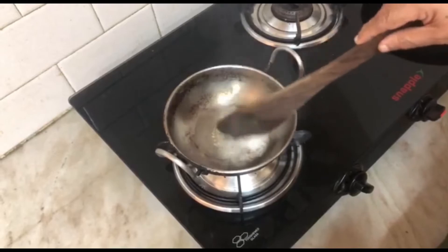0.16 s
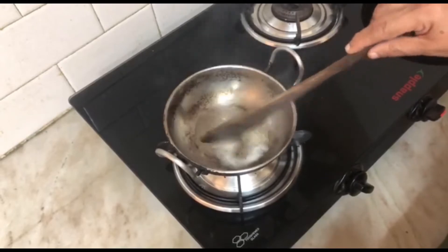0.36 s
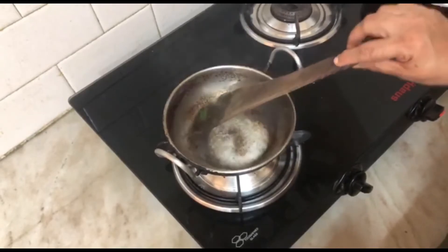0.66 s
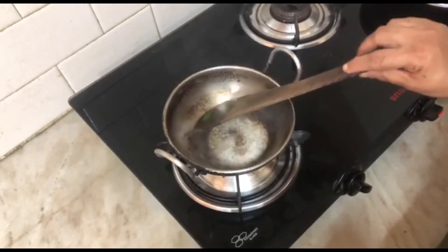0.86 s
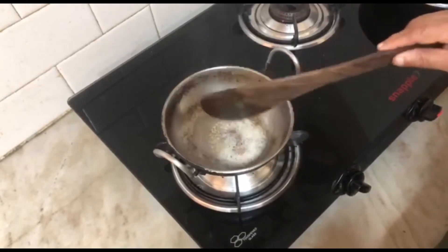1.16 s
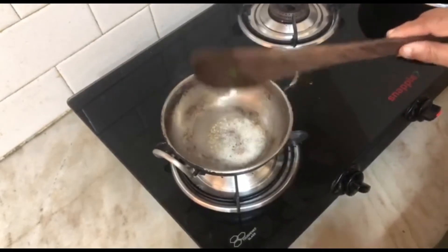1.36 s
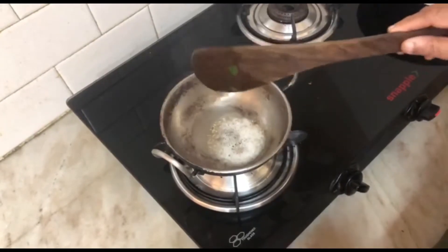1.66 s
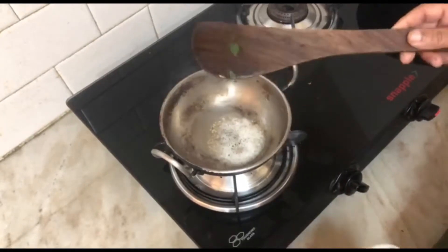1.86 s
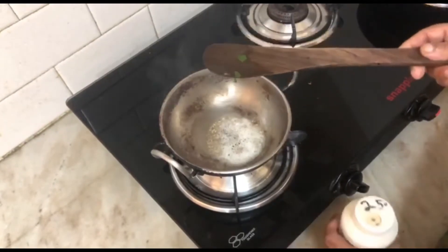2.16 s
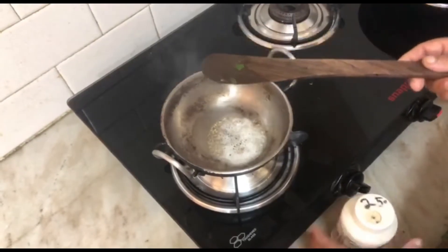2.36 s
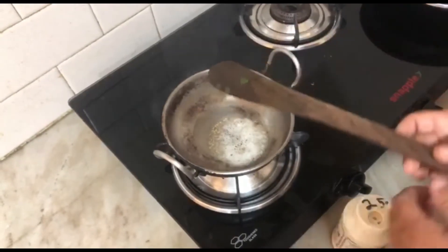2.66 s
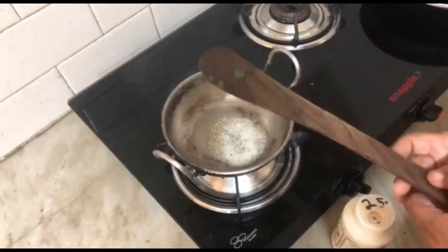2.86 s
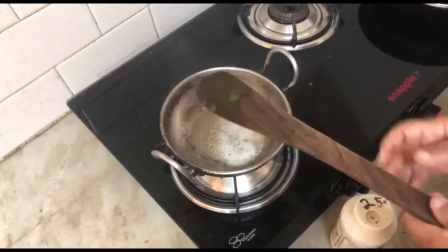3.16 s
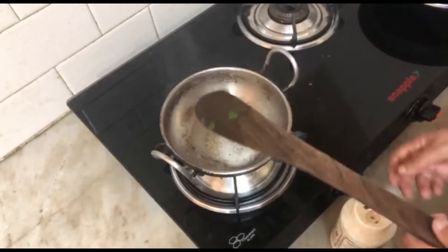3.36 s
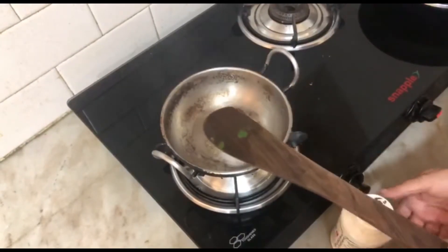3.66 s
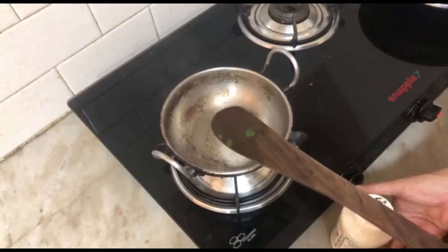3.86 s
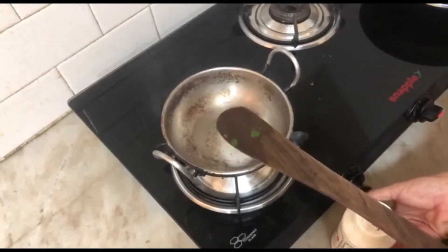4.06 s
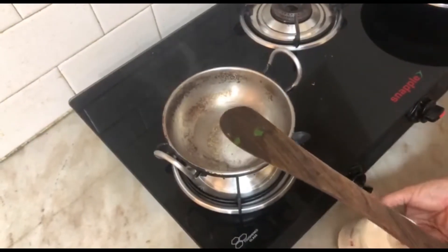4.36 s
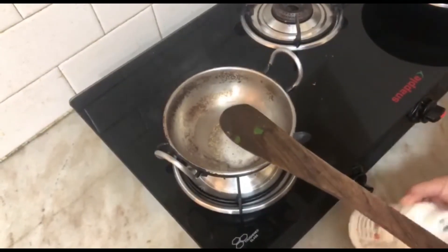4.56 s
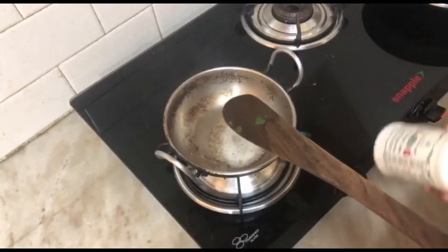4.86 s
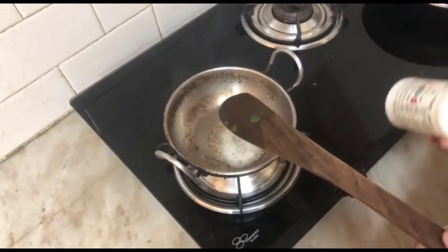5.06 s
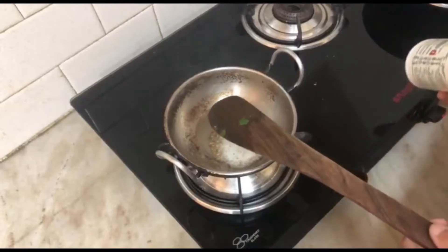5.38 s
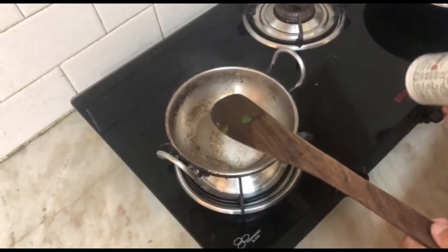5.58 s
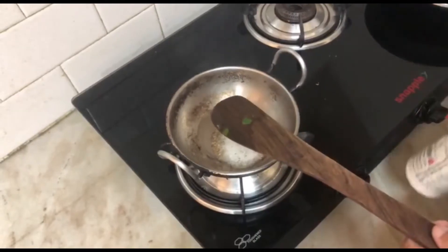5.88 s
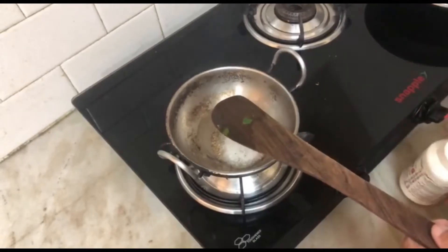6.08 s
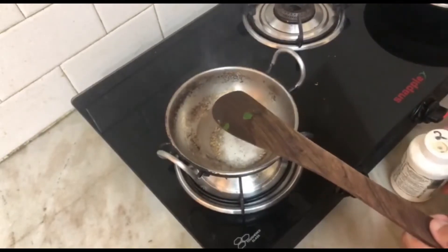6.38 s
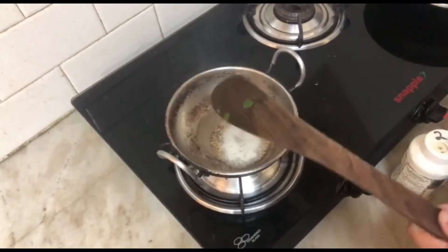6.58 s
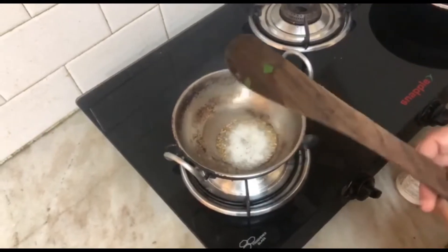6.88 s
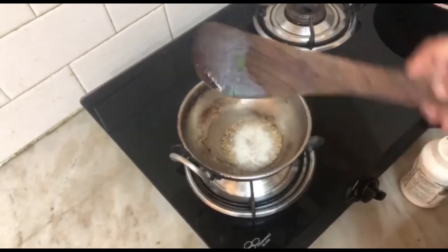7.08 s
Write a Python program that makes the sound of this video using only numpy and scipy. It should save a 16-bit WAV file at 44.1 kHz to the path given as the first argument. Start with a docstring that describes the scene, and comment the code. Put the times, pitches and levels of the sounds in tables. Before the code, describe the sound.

Seeds splutter with sharp, bright pops in hot oil over a steadily rushing gas flame, thinning out as dull wooden knocks sound nearby.

```python
"""A gas flame rushes and hot oil fizzes; at once seeds splutter in a small steel pan, in a tiled kitchen.
Flame and fizz are coloured noise, the fizz flaring as a wooden spatula stirs the oil and then settling.
Mustard and cumin seeds burst as damped cavity rings, coloured by the bowl and followed by echoes.
A spice jar and the spatula knock dully: contact sounds start the decaying modes of stove and counter."""
import sys
import numpy as np
from scipy import signal
from scipy.fft import rfft, irfft
from scipy.io import wavfile

SR = 44100
rng = np.random.default_rng(int(sys.argv[2]) if len(sys.argv) > 2 else 0)


def wav_out(sig):
    """Save sig, one row per channel (or a flat mono array), as 16-bit PCM at SR to the path in sys.argv[1]."""
    wavfile.write(sys.argv[1], SR, np.round(np.clip(np.atleast_2d(sig).T, -1, 1) * 32767).astype(np.int16))


N = 318842

# steady rush of the burner: pitch_hz, relative_level_db
BURNER_SPECTRUM = [(25, -12), (38, -9.5), (70, -12), (150, -9.5), (330, -11), (600, -13.5), (950, -20),
                   (1270, -14), (1600, -20.5), (2170, -15.5), (2700, -23.5), (4500, -26.5), (8000, -35.5),
                   (11500, -42)]
# hollow resonances driven by the flame: pitch_hz, width_at_half_lift_hz, lift_db
FLAME_HOLLOWS = [(51.3, 14.4, 13.5), (97.7, 16.6, 14.5), (135, 8.8, 8.5), (282.2, 6.6, 5), (755.6, 130, 10)]
# spectrum of the boiling ticks: pitch_hz, relative_level_db
FIZZ_SPECTRUM = [(600, -6), (1500, -4.5), (3000, -8), (5500, -5.5), (8000, -11), (11000, -19.5)]
# strokes of the spatula that freshen the fizz: start_s, level_db, settling_db_per_s
SPATULA_STROKES = [(0, -52, 26.5), (0.714, -49.5, 118)]
# what the bowl radiates of a burst: pitch_hz, relative_level_db
BOWL_RADIATION = [(200, -44), (500, -13.5), (750, -4), (1100, 3.5), (1800, 1.5), (2300, -0.5), (2750, 1),
                  (3400, 4), (4500, 2), (5600, 3.5), (7000, 0.5), (9000, -3.5), (11000, -7)]
# first echoes from the pan wall and the hob: delay_s, gain_ratio
FIRST_ECHOES = [(.00044, 0.24), (.0013, 0.14), (.0045, .17)]
# decay of the kitchen's reflections: pitch_hz, t60_s
KITCHEN_DECAY = [(150, 0.63), (1000, 0.46), (3000, 0.46), (6000, 0.36), (11000, 0.54)]
# louder bursting seeds: start_s, level_db (over 1 ms), cavity_pitch_hz, husk_snap_db (against the ring)
LOUD_SEEDS = [(0.0202, -37.5, 4860, -11), (.0664, -35, 7020, -8), (0.0951, -27, 2020, -18),
              (0.1739, -16, 1820, -2), (.2168, -31.5, 1840, -30), (.3891, -23, 5000, -2.5),
              (0.4176, -33.5, 950, -5), (0.4345, -30.5, 1390, -6), (.6593, -44.5, 5900, -15),
              (.802, -40, 7700, -13), (0.8374, -38.5, 2320, 2), (0.8458, -29.5, 1170, 15),
              (.8588, -40, 4310, -10), (1.2155, -45.5, 5140, -12), (1.4047, -47, 5620, -28),
              (1.5647, -22, 5420, -9), (1.8956, -30.5, 1370, -19.5), (2.1045, -42.5, 8600, 1),
              (2.1219, -29, 1920, -24), (2.4812, -46, 2630, -9), (2.6247, -45, 7000, -8),
              (2.8751, -30, 1320, 6), (2.9223, -40.5, 5000, -14), (3.4278, -28.5, 1080, -7.5),
              (3.5292, -41.5, 5400, -2), (3.6833, -38, 1950, -4), (3.766, -46, 7000, -3),
              (3.7762, -42.5, 5600, -21), (3.9468, -47.5, 9300, -9), (4.3527, -46, 3350, -30),
              (4.484, -37, 5730, -3), (4.5319, -40, 1870, -5), (4.7986, -38, 4700, 2),
              (4.8865, -39, 910, 0), (4.9988, -45.5, 4500, -4), (5.2146, -42, 2290, -35),
              (5.3663, -26.5, 8800, -3), (5.4602, -40, 950, -32), (5.6592, -28.5, 930, -10),
              (5.7768, -34, 5600, -22), (6.1315, -32, 2050, 13), (6.4816, -37, 1900, -9)]
# dull knocks: start_s, level_db, blow_centre_hz, blow_q (narrowness), contact_clack_db
DULL_KNOCKS = [(0.716, -52, 286, 4.2, -51), (2.058, -48, 286, 2.3, -65), (2.087, -51, 195, .8, -69),
               (2.209, -46, 208, 2.7, -56.5), (3.999, -54.5, 207, 3.1, -73),
               (6.065, -38.3, 155, 0.83, -41.5), (6.268, -40, 174, 0.52, -45),
               (6.341, -41, 290, 0.6, -42.5), (6.383, -42.5, 327, 0.55, -54.5),
               (6.995, -57, 210, 7.6, -56.5)]
# modes of the stove and counter: pitch_hz, relative_level_db, t60_s
STOVE_MODES = [(91, 1, 0.48), (139, -7.5, 0.62), (179.8, -4, 0.5), (235, -14, 0.6), (266.6, -2, 0.34),
               (301.6, -8, 0.21), (352, -10, 0.38), (424, -9.5, 0.34), (495, -5.5, 0.12), (738, -30, 0.067)]

RESTING_FIZZ_DB, DRYING_DB_PER_S = -67, 2.4  # the resting fizz sinks as the moisture boils off
STIR_RISE_DB_PER_S = 1000
CAVITY_WIDTH_HZ = 670  # the oil damps every cavity equally fast, so higher pops ring for more cycles
FAINT_DB, FAINT_SPREAD_DB, FAINT_SNAP_DB = -54, -1.5, -19
FAINT_LOW_HZ, FAINT_HIGH_HZ = 1730, 8200  # pitches of a large and a small cavity
# contact tick that starts a knock; TICK_DB is against the clack
TICK_HZ, TICK_Q, TICK_SNAP_DB, TICK_DB = 1150, 0.96, -26, 4
TOP_HZ = 11800


def gain_of(db):
    """Decibel law: 20 dB is a tenfold amplitude."""
    return 10 ** (np.asarray(db) / 20)


def evened(x):
    """Normalisation to unit rms."""
    return x / np.sqrt(np.mean(x ** 2) + 1e-20)


def read(points, hz):
    """Interpolation of a spectrum along a logarithmic frequency axis."""
    f, value = np.transpose(points)
    return np.interp(np.log(hz + 1), np.log(f + 1), value)


def add(mix, s, sound):
    """Superposition: a sound joins the mix at time s."""
    part = mix[max(round(s * SR), 0):][:len(sound)]
    part += sound[:len(part)]


def drift(rate_hz):
    """Low-passed noise: a random wander of unit rms, mostly slower than rate_hz."""
    hz = np.fft.rfftfreq(N, 1 / SR)
    low_pass = (hz > 0) / (1 + (hz / rate_hz) ** 4)
    return evened(irfft(rfft(rng.standard_normal(N)) * low_pass, N))


def burner(level_db=-53.5, flutter_db=1.52):
    """Resonant excitation: broadband flame noise flutters and sets the hollows under the pan humming."""
    hz = np.fft.rfftfreq(N, 1 / SR)
    colour_db = read(BURNER_SPECTRUM, hz)
    for f, width, lift_db in FLAME_HOLLOWS:
        colour_db = colour_db + lift_db / (1 + (2 * (hz - f) / width) ** 4)
    rush = evened(irfft(rfft(rng.standard_normal(N)) * gain_of(colour_db), N))
    return gain_of(level_db + flutter_db * drift(rate_hz=31.0)) * rush


def fizz(per_s=1500):
    """Shot noise: countless ticks of moisture boil off in the oil; each stir makes them flare and settle."""
    t = np.arange(N) / SR
    ticks = rng.choice([-1, 1], N) * (rng.random(N) < per_s / SR)
    colour = gain_of(read(FIZZ_SPECTRUM, np.fft.rfftfreq(N, 1 / SR)))
    sound = irfft(rfft(ticks) * colour, N)
    levels_db = [RESTING_FIZZ_DB - DRYING_DB_PER_S * t]
    for s, db, settling in SPATULA_STROKES:
        fall_db = np.maximum(STIR_RISE_DB_PER_S * (s - t), settling * (t - s))
        levels_db.append(db - fall_db)
    envelope = np.linalg.norm(gain_of(levels_db), axis=0)  # powers add
    return evened(sound) * envelope


def bubbles(level_db=-67.5, per_s=75, spread_db=4.5, count=16):
    """Bubble resonance: small steam bubbles break round the seeds, each size with its own pitch."""
    out = np.zeros(N)
    for hz in np.geomspace(1500, 4400, count):
        strengths = gain_of(spread_db * np.minimum(rng.exponential(1, N), 2.8))
        breaks = strengths * (rng.random(N) < per_s / count / SR)
        out += signal.oaconvolve(breaks, burst(hz, q=17.0))[:N] / hz  # higher bubbles are weaker
    return gain_of(level_db) * evened(out)


def burst(hz, q, snap_db=-30, size=1024):
    """Damped resonance: a cavity ring and broad husk snap, coloured by the bowl, as a click of energy 1."""
    f = np.fft.rfftfreq(size, 1 / SR) + 1
    ring_power = 1 / (1 + (q * (f / hz - hz / f)) ** 2)
    gain = gain_of(read(BOWL_RADIATION, f)) * np.sqrt(ring_power + gain_of(snap_db) ** 2)
    # a larger, lower cavity opens more slowly and is duller
    gain /= np.sqrt(1 + (f / (180 * np.sqrt(hz))) ** 4)
    # minimum phase: the energy comes as early as this spectrum allows
    log_gain = np.log(np.r_[gain, gain[-2:0:-1]] + 1e-5)
    click = np.fft.ifft(np.exp(np.conj(signal.hilbert(log_gain)))).real[:size // 2]
    return click / np.linalg.norm(click)


def scatter(t60, onset_s, size=1500):
    """Diffuse scattering: a quickly dying patter of small reflections, energy 1."""
    t = np.arange(size) / SR
    onset = 1 - np.exp(-(t / onset_s) ** 2)
    patter = rng.standard_normal(size) * gain_of(-60 * t / t60) * onset
    return patter / np.linalg.norm(patter)


def kitchen(build_s=0.0074, size=22000):
    """Reverberation: a tail of reflections off the tiles, energy 1, each band with its own decay."""
    taps = rng.standard_normal(size) * (rng.random(size) < 5000 / SR)  # 5000 reflections per s
    hz, t, bands = signal.stft(taps, SR, nperseg=256)
    decay = gain_of(-60 * t / read(KITCHEN_DECAY, hz)[:, None])
    tail = signal.istft(bands * decay, SR, nperseg=256)[1]
    tail *= 1 - np.exp(-(np.arange(len(tail)) / SR / build_s) ** 2)
    return tail / np.linalg.norm(tail)


def pop(db, hz, q, snap_db, room_db=-8.5, room_q_share=0.36):
    """Direct and reflected sound: a sharp click whose echoes and room tail vary with its spot."""
    near = gain_of(-4.0) * scatter(t60=0.02, onset_s=0.00033)
    near[0] += 1  # the direct path
    for delay, gain in FIRST_ECHOES:
        add(near, delay * (1 + .03 * rng.standard_normal()), np.array([gain]))
    direct = signal.fftconvolve(burst(hz, q, snap_db), near)
    # the room gathers sound from all sides of the pan, which blurs the pitch
    blurred = burst(hz, q * room_q_share, snap_db)
    sound = gain_of(room_db) * signal.fftconvolve(blurred, kitchen())
    add(sound, 0, direct / np.linalg.norm(direct))
    return gain_of(db) * np.sqrt(SR / 1000) * sound  # unit energy spread over 1 ms has rms 1


def pops():
    """Impulsive radiation: the louder seeds burst, each ringing at its cavity's pitch."""
    out = np.zeros(N)
    for s, db, hz, snap_db in LOUD_SEEDS:
        add(out, s, pop(db, hz, hz / CAVITY_WIDTH_HZ, snap_db))
    return out


def faint_pops(count=24):
    """Random impulses: faint seeds burst now and then, with random strength and cavity pitch."""
    out = np.zeros(N)
    for k, (when, strength, smallness) in enumerate(rng.random((count, 3))):
        hz = FAINT_LOW_HZ * (FAINT_HIGH_HZ / FAINT_LOW_HZ) ** smallness
        db = FAINT_DB + FAINT_SPREAD_DB * (2 * strength - 1)
        s = (k + 2 * when) / count * N / SR
        add(out, s, pop(db, hz, hz / CAVITY_WIDTH_HZ, FAINT_SNAP_DB))
    return out


def puff(t, low_hz, high_hz, t60):
    """High modal density: many close modes in one band, heard as a dying rattle of noise."""
    band = signal.butter(2, [low_hz, high_hz], "band", fs=SR, output="sos")
    return signal.sosfilt(band, rng.standard_normal(len(t)) * gain_of(-60 * t / t60))


def knocks(rise_s=0.00018, rattle_db=-13, rattle_t60=0.22, clack_t60=0.017):
    """Modal excitation: a tick and woody clack of contact, with low stove modes round the blow's centre."""
    out, t = np.zeros(N), np.arange(SR // 2) / SR
    for s, db, hz, q, clack_db in DULL_KNOCKS:
        ring = np.zeros(len(t))
        for f, level, t60 in STOVE_MODES:
            ring += gain_of(level - 60 * t / t60) * np.sin(2 * np.pi * (f * t + rng.random()))
        body = evened(ring) + gain_of(rattle_db) * evened(puff(t, 87, 770, rattle_t60))
        # the blow is a band-pass resonance about its centre
        blow = signal.bilinear([1 / q, 0], [1, 1 / q, 1], SR / (2 * np.pi * hz))
        thud = signal.lfilter(*blow, body * (1 - np.exp(-t / rise_s)))
        add(out, s, gain_of(db) * thud / np.std(thud[:SR // 20]))  # level over the first 50 ms
        clack = puff(t, 214, 740, clack_t60)
        add(out, s, gain_of(clack_db) * clack / np.std(clack[:SR // 100]))  # over the first 10 ms
        add(out, s, pop(clack_db + TICK_DB, TICK_HZ, TICK_Q, TICK_SNAP_DB))
    return out


def scene():
    """Superposition: flame, reverberant oil, seeds and knocks sum at one point."""
    oil = bubbles() + fizz()
    oil = oil + gain_of(-2.5) * signal.fftconvolve(oil, kitchen())[:N]
    return (burner() + oil + pops() + faint_pops() + knocks())[None]


def record(dry):
    """Band limitation: the microphone sheds the deepest rumble, then a low-pass cuts the highest treble."""
    high_pass = signal.butter(8, 41, "high", fs=SR, output="sos")
    thinned = signal.sosfilt(high_pass, dry)
    low_pass = signal.firwin(255, TOP_HZ, window=("kaiser", 8), fs=SR)
    return signal.oaconvolve(thinned, low_pass[None], "same")


dry = scene()
out = record(dry)
wav_out(out)
```